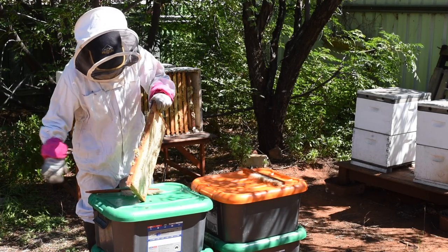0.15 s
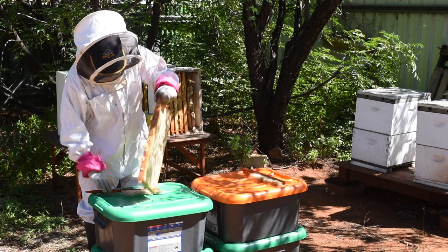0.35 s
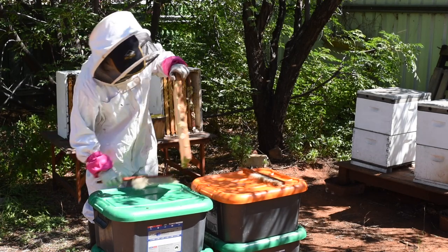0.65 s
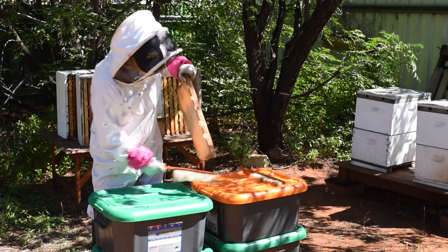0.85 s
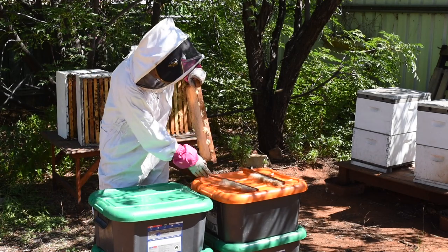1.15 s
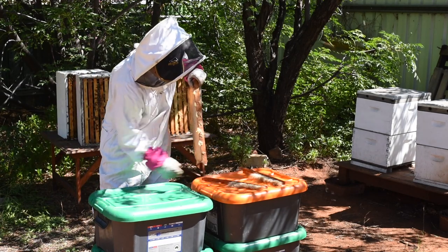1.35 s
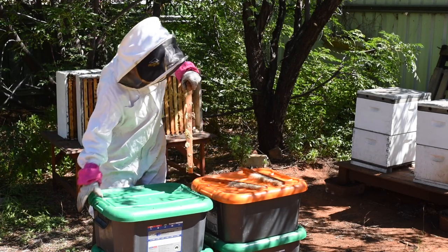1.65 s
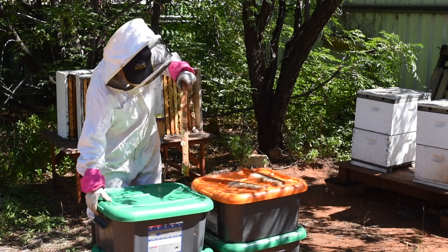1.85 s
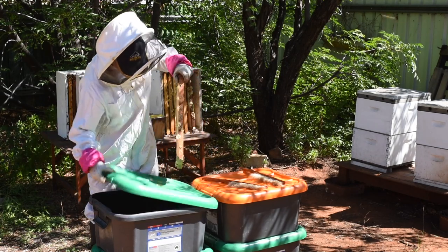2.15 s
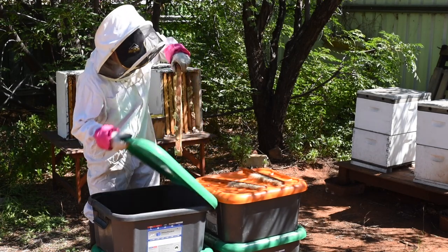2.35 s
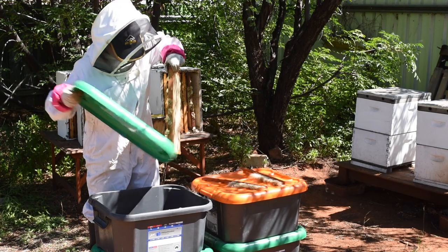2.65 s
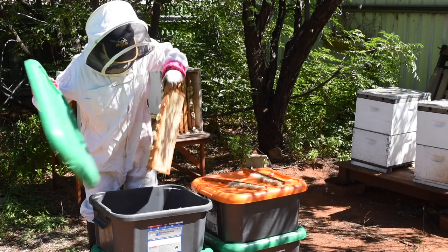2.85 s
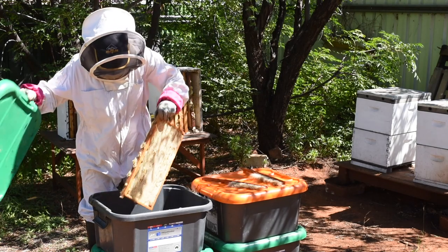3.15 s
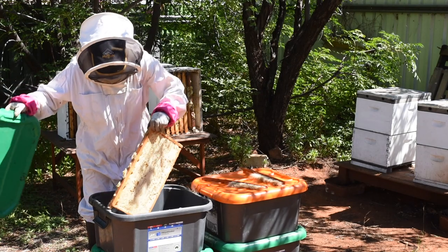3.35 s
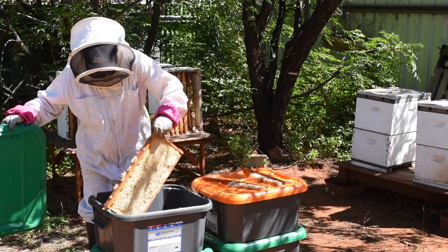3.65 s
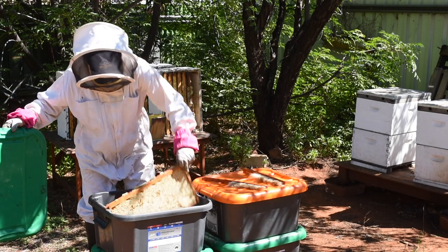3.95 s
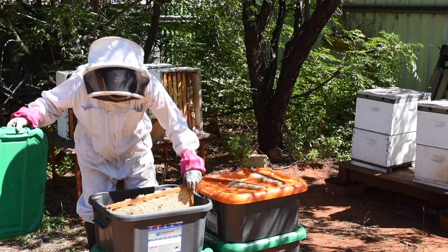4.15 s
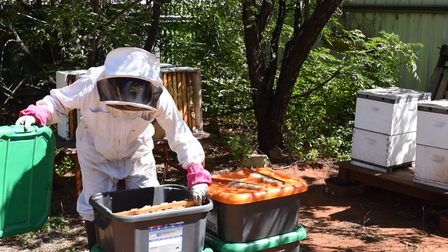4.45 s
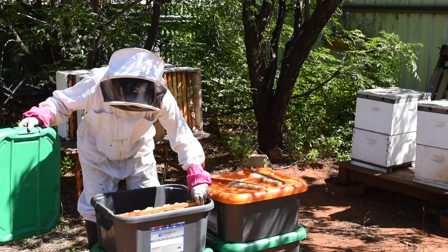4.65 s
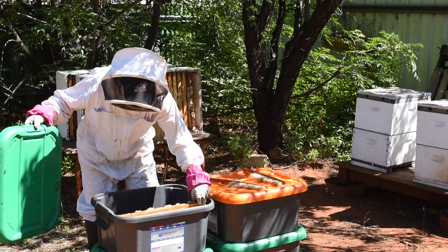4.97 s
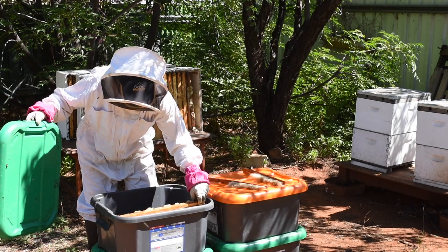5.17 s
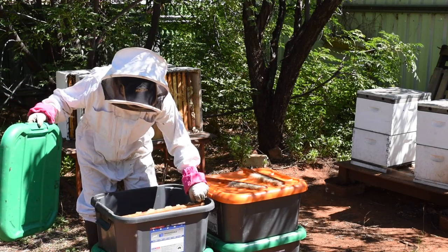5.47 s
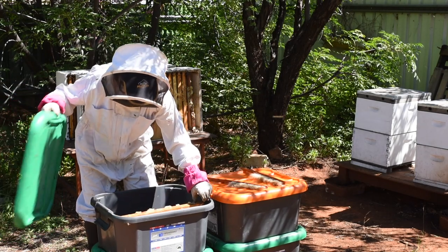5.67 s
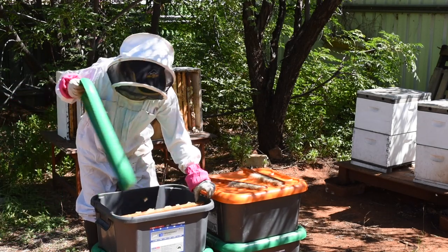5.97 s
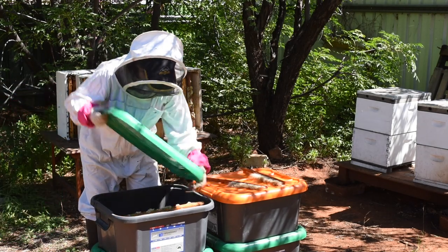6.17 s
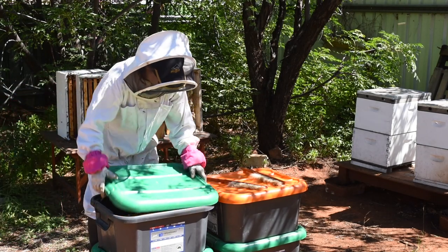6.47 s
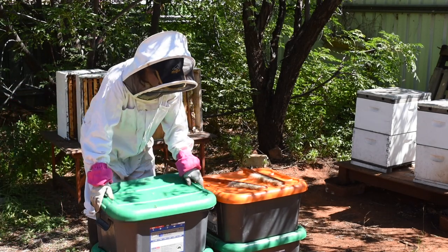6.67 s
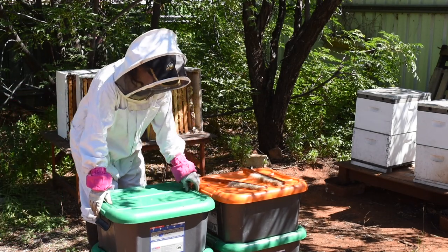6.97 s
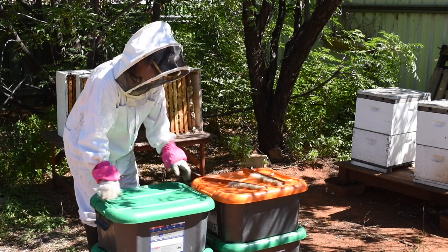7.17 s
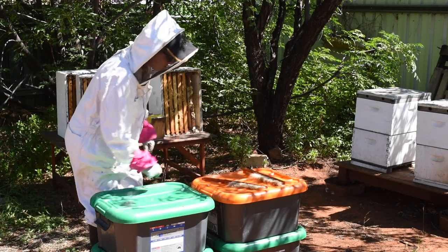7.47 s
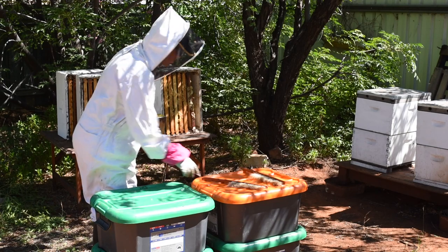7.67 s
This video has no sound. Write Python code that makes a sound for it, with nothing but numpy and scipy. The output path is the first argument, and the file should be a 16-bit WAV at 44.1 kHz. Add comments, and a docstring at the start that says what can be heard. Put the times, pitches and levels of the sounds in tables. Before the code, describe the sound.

Outdoors beside open hives, dozens of bees hum in a steady low drone over faint air and hiss. A metal tool drops sharply onto a plastic tub lid, the lid is pried up with light ticks and scrapes, then a wooden frame falls into the tub with a loud hollow clunk and smaller knocks. The lid is pressed shut with several snaps while the hum swells. Close, dry, nearly mono microphone.

```python
"""Honey bees hum steadily around open hives; a hive tool drops on a plastic tub, its lid is pried off,
a wooden frame is lowered in and falls flat, and the lid is snapped shut while the hum swells.
Blows are sums of decaying modes and filtered noise with a crack at contact; scrapes are random slips
that ring the plastic; each bee is a wing cycle read at a wandering rate; air and hiss are shaped noise."""
import sys
import numpy as np
from scipy import signal
from scipy.fft import rfft, irfft
from scipy.io import wavfile
from scipy.ndimage import uniform_filter1d, map_coordinates

SR = 44100
rng = np.random.default_rng(int(sys.argv[2]) if len(sys.argv) > 2 else 0)


def generate_wav(signal):
    """Clip the signal to [-1, 1] and save it as 16-bit WAV at the path in sys.argv[1]."""
    frames = np.transpose(np.atleast_2d(signal))
    scaled = np.clip(frames, -1, 1) * 32767
    pcm = np.round(scaled).astype(np.int16)
    wavfile.write(sys.argv[1], SR, pcm)


N = 344862
BLOW_S = 0.5


def undb(db):
    """Decibels to amplitude gain."""
    return 10 ** (np.asarray(db) / 20)


def unit(x):
    """Scale to rms 1."""
    return x / np.sqrt(np.mean(x ** 2) + 1e-20)


def add(track, start_s, sound):
    """Mix a sound into a track, cut at the track's end."""
    start = int(start_s * SR)
    track[start:start + len(sound)] += sound[:len(track) - start]


def band(x, lo_hz, hi_hz):
    """Causal third-order Butterworth band-pass."""
    return signal.sosfilt(signal.butter(3, [lo_hz, hi_hz], "band", fs=SR, output="sos"), x)


def coloured(points, size=N):
    """Noise of rms 1 whose spectrum follows (Hz, relative dB) points, joined on a log axis."""
    hz, db = np.transpose(points)
    f = np.arange(size // 2 + 1) * SR / size
    gain = undb(np.interp(np.log(f + 1), np.log(hz), db))
    return unit(irfft(rfft(rng.standard_normal(size)) * gain, size))


def walk(rate_hz):
    """Smooth random curve with a spread near 1: a cubic spline through rate_hz knots a second."""
    knots = rng.standard_normal(1024)
    coarse = np.arange(0, N + 128, 128)
    curve = map_coordinates(knots, [coarse / SR * rate_hz], order=3, mode="wrap")
    return np.interp(np.arange(N), coarse, curve)


def ring(modes, t, detune=0.006, weight_spread_db=0.53):
    """Decaying sine modes of a struck object; each blow lands elsewhere and reweights them."""
    hz, db, t60_s = np.transpose(modes)[:, :, None]
    shift, weight, angle = rng.standard_normal((3, len(modes), 1))
    waves = np.sin(2 * np.pi * (hz * (1 + detune * shift) * t + angle))
    decay = undb(db + weight_spread_db * weight - 60 * t / t60_s)
    return np.sum(decay * waves, axis=0) / np.sqrt(np.sum(undb(db) ** 2) / 2)


# Dense wall ring. Each row: frequency in Hz, time to decay by 60 dB in s.
WALL_DECAY = [(80, 0.47), (210, 0.28), (560, 0.32), (1470, 0.23), (3880, 0.33), (10200, 0.13)]


def walls(colour, t):
    """Dense rattle of the plastic walls: noise dying away octave by octave."""
    hz, t60_s = np.transpose(WALL_DECAY)
    noise = coloured(colour, size=len(t))
    rattle = np.zeros(len(t))
    for lo_hz in 62 * 2 ** np.arange(8):
        octave_t60_s = np.interp(np.log(lo_hz * np.sqrt(2)), np.log(hz), t60_s)
        rattle += band(noise, lo_hz, 2 * lo_hz) * undb(-60 * t / octave_t60_s)
    return rattle


SPOT_OCTAVES, SPOT_DECAY_S = 0.4, 0.0087


def spot(hz, t):
    """The struck spot: a brief noise burst in a narrow band around its pitch, peak 1."""
    half_width = 2 ** (SPOT_OCTAVES / 2)
    burst = rng.standard_normal(len(t)) * np.exp(-t / SPOT_DECAY_S)
    cluster = band(burst, hz / half_width, hz * half_width)
    return cluster / np.abs(cluster).max()


# Limits in Hz of the five registers: boom, thud, knock, clack, tick.
REGISTER_EDGES_HZ = [108, 280, 900, 2000, 5500, 12500]
HARDNESS_PIVOT_HZ = 1360
# Whole-tub shove; its level grows faster than the blow (dB per dB).
THUMP_HZ, THUMP_DECAY_S, THUMP_GROWTH = 48.3, 0.034, 1.55


def blows(hits, modes, colour, voice, modes_db, spot_db, thump_db):
    """Contact cracks, then spot, modes and walls ring; hardness tilts the registers above the boom."""
    t = np.arange(int(BLOW_S * SR)) / SR
    thump = np.sin(2 * np.pi * THUMP_HZ * t) * np.exp(-t / THUMP_DECAY_S)
    out = np.zeros(N)
    for start_s, strength_db, hardness_db_per_oct, boom_db, spot_hz in hits:
        body = undb(modes_db) * ring(modes, t) + walls(colour, t)
        for k, (level_db, crack_db, crack_s) in enumerate(voice):
            lo_hz, hi_hz = REGISTER_EDGES_HZ[k], REGISTER_EDGES_HZ[k + 1]
            share_db = boom_db
            if k > 0:
                share_db = hardness_db_per_oct * np.log2(np.sqrt(lo_hz * hi_hz) / HARDNESS_PIVOT_HZ)
            crack = undb(crack_db) * np.exp(-(t / crack_s) ** 2)
            part = band(body * (1 + crack), lo_hz, hi_hz)
            # level is set by the attack alone
            attack = t < .01 + 2 / lo_hz
            add(out, start_s, part / np.std(part[attack]) * undb(strength_db + level_db + share_db))
        add(out, start_s, spot(spot_hz, t) * undb(strength_db + spot_db))
        add(out, start_s, thump * undb(THUMP_GROWTH * strength_db + thump_db))
    return out


# Tool blows. Each row: start in seconds, strength in dB, hardness in dB per octave, boom in dB,
# pitch of the struck spot in Hz.
TOOL_BLOWS = [(.475, -45.5, -4.5, 8, 450), (1.165, -26.5, -0.4, 2.5, 670), (1.278, -14.5, 3, -1.5, 1300),
              (1.297, -31, 3, 2, 1530), (1.342, -30, -2.5, 3, 1500)]
# Modes of the shut tub. Each row: frequency in Hz, relative level in dB, time to decay by 60 dB in s.
SHUT_TUB_MODES = [(110, -2.5, 0.3), (160, 6.5, 0.21), (196, -5.5, 0.3), (414, 3, 0.14), (619, 0, 0.18),
                  (708, 7.5, 0.07), (795, 0.5, 0.18), (855, -2, 0.23), (1280, -6, 0.11),
                  (1292, 12.5, 0.037), (1370, -4, 0.35), (1484, 6, 0.21), (1613, -7, 0.31),
                  (1980, -30, 0.14), (3060, 4, 0.047), (4340, -22, 0.49), (4170, 0, 0.18),
                  (8430, -10, 0.042)]
# Wall rattle spectrum. Each row: frequency in Hz, relative level in dB.
TOOL_RATTLE = [(60, -36), (150, 4), (290, -10), (420, -8), (520, -7), (750, -11), (1050, -13.5),
               (1300, -2.5), (2200, -17), (2900, -10.5), (3700, -18), (4300, -16.5), (8500, -19),
               (11000, -36), (15000, -37)]
# One row per register: level in dB, crack over the ring in dB, crack length in seconds.
TOOL_REGISTERS = [(-7, -8, 0.03), (-4.5, -5, 0.0033), (-3, -7, 0.0033), (-9.5, 10.5, 0.0024),
                  (-15, 19, 0.0016)]


def hive_tool():
    """Metal tool dropped on the lid of the shut tub."""
    return blows(TOOL_BLOWS, SHUT_TUB_MODES, TOOL_RATTLE, TOOL_REGISTERS,
                 modes_db=2, spot_db=2, thump_db=-26)


# Lid blows. Each row: start in seconds, strength in dB, hardness in dB per octave, boom in dB,
# pitch of the struck spot in Hz.
LID_BLOWS = [(2.195, -41, -3, 10, 300), (2.222, -30.5, -1.5, 4, 500), (2.256, -42.5, 6, 12.5, 222),
             (2.367, -42, -0.5, 8.5, 246), (2.408, -44, 4, 5, 2500), (2.449, -30, 1, 2.5, 2900),
             (6.299, -39, 3, -17, 448), (6.367, -55, 9, -9, 2500), (6.565, -20.5, -0.3, -12.5, 1560),
             (6.594, -32, -.5, -3, 1200), (6.671, -19.5, -0.1, -10.5, 1360), (6.716, -30.5, 2.5, -5, 2840),
             (6.757, -38, -3.5, -13, 910), (6.806, -26, 2.5, -1.5, 2680), (6.870, -22, -0.3, -0.5, 880),
             (7.050, -37.5, 2.5, 7, 586)]
# Modes of the lid. Each row: frequency in Hz, relative level in dB, time to decay by 60 dB in s.
LID_MODES = [(122.8, -19.5, 0.83), (149.2, -7, 0.59), (185.2, 2.5, 0.19), (229.7, 6, 0.09),
             (357, -0.5, 0.24), (597, 6, 0.14), (727, 10, 0.025), (846, -2.5, 0.12), (953, -11.5, 0.17),
             (1155, 1.5, 0.12), (1403, 3, 0.031), (1500, -2.5, 0.08), (1900, -15, 0.13), (2315, 1, 0.043),
             (2960, -8, 0.11), (3130, -6, .08), (4300, -44, .11)]
# Wall rattle spectrum. Each row: frequency in Hz, relative level in dB.
LID_RATTLE = [(60, -24), (190, -8), (270, -14), (370, -1), (500, -14.5), (620, -7.5), (1000, -9),
              (1450, -11.5), (2100, -16), (2900, -17.5), (3700, -25.5), (5500, -29.5), (9000, -37),
              (15000, -85)]
# One row per register: level in dB, crack over the ring in dB, crack length in seconds.
LID_REGISTERS = [(0, -11, 0.026), (-2, 2.5, 0.0059), (-1, 6, 0.0077), (-9, 10.5, 0.0034), (-27, -1, .0074)]


def tub_lid():
    """Plastic lid pried off, later laid back and snapped shut."""
    return blows(LID_BLOWS, LID_MODES, LID_RATTLE, LID_REGISTERS,
                 modes_db=2.5, spot_db=5.5, thump_db=-20)


# Frame blows. Each row: start in seconds, strength in dB, hardness in dB per octave, boom in dB,
# pitch of the struck spot in Hz.
FRAME_BLOWS = [(3.470, -47, -6.5, 8.5, 390), (3.596, -40, -5, 8, 660), (3.921, -42, -3.5, 13, 230),
               (3.936, -40.5, -3.5, 3.5, 700), (4.538, -13.5, -1, -3.5, 1020), (4.542, -17, 2.5, 1, 600),
               (4.562, -19.5, -0.5, 0, 370), (4.614, -20, -0.5, -1, 510), (4.699, -39, 0.5, -12, 1510),
               (4.808, -37.5, 2.5, -19, 2340), (5.267, -28, 1, -4, 870), (5.339, -38, 2, -1, 680),
               (5.454, -24.5, -0.8, -6, 624)]
# Modes of the open tub. Each row: frequency in Hz, relative level in dB, time to decay by 60 dB in s.
OPEN_TUB_MODES = [(107.8, -1.5, 0.48), (156, -3, 0.16), (194.8, 2.5, 0.2), (236.6, -5.5, 0.25),
                  (385, -12.5, 0.21), (397, 10.5, 0.041), (446, 2.5, 0.036), (609, 2, 0.11),
                  (734, -0.5, 0.076), (845, -27, 0.16), (1130, -4, 0.038), (1266, -8, 0.07),
                  (2070, -36, 0.13), (2310, -34, 0.1)]
# Wall rattle spectrum. Each row: frequency in Hz, relative level in dB.
FRAME_RATTLE = [(60, 1), (105, 3), (190, 6), (290, -3.5), (380, -3.5), (520, -4.5), (640, -7.5),
                (1150, -16), (1700, -21), (2500, -20), (3600, -27.5), (5000, -24), (6500, -37.5),
                (8600, -29), (15000, -82)]
# One row per register: level in dB, crack over the ring in dB, crack length in seconds.
FRAME_REGISTERS = [(-1.5, 8.8, 0.0062), (-3, 3.2, 0.019), (-3.5, 5.2, 0.0074), (-11.5, 11, .0078),
                   (-20, 4.7, 0.0072)]


def wooden_frame():
    """Wooden frame knocking into the open tub and falling flat."""
    return blows(FRAME_BLOWS, OPEN_TUB_MODES, FRAME_RATTLE, FRAME_REGISTERS,
                 modes_db=-1.5, spot_db=2.5, thump_db=-21)


# Plastic and wood rubbing on the tub. Each row: middle in seconds, half length in seconds,
# level of the loudest stretch in dB, brightness in Hz.
RUBS = [(2.01, 0.1, -43.5, 1200), (2.19, .025, -36, 150), (2.24, 0.029, -28.5, 800),
        (2.434, 0.028, -34, 2500), (2.47, 0.024, -27.5, 6960), (2.529, .11, -43, 100),
        (3.609, .012, -38.5, 1200), (4.598, 0.052, -26.5, 5000), (6.776, 0.03, -33.5, 2000),
        (6.895, 0.021, -33, 2500), (7.056, .022, -30.5, 400)]


def scrapes(slips_per_s=1600, scatter_db=3.0, modes_db=-2, crack_db=14, crack_s=0.0025):
    """A rim sticks and slips along the tub; every slip rings the plastic."""
    t = np.arange(int(BLOW_S * SR)) / SR
    out = np.zeros(N)
    for middle_s, half_s, level_db, bright_hz in RUBS:
        slips = rng.random(len(t)) < slips_per_s / SR
        slips = slips * undb(scatter_db * rng.standard_normal(len(t)))
        slips = slips * np.exp(-((t - t.mean()) / half_s) ** 2)
        body = undb(modes_db) * ring(LID_MODES, t) + walls(FRAME_RATTLE, t)
        body = body * (1 + undb(crack_db) * np.exp(-t / crack_s))
        # a harder edge slips more abruptly: less bass, more treble
        edge_hz = [110 + 0.031 * bright_hz, 160 + bright_hz]
        edge = signal.butter(1, edge_hz, "band", fs=SR, output="sos")
        rub = signal.sosfilt(edge, signal.fftconvolve(slips, body))
        loudest = np.sqrt(uniform_filter1d(rub ** 2, size=1500).max())
        add(out, middle_s - t.mean(), rub / loudest * undb(level_db))
    return out


# Partials of a wingbeat. Each row: multiple of the wingbeat rate, relative level in dB.
WING_PARTIALS = [(1, 0.5), (2, 7), (3, -0.5), (4, 2), (5, -0.5), (6, -2), (8, -9), (11, -16.5), (16, -22.5),
                 (22, -19.5)]


def bee(wingbeat_hz, drift=.042, flutter=.018, near_db=3.5, turn_db=3.0):
    """One bee: a buzzing wing cycle whose rate and strength wander as it darts about."""
    multiple, db = np.transpose(WING_PARTIALS)
    k = np.arange(1, 25)
    partials_db = np.interp(k, multiple, db) + 2.6 * rng.standard_normal(len(k))
    partials = undb(partials_db) * np.exp(2j * np.pi * rng.random(len(k)))
    cycle = unit(irfft(np.r_[0, partials], 2 ** 14))
    rate_hz = wingbeat_hz * (1 + drift * walk(2.5) + flutter * walk(22))
    phase = np.cumsum(rate_hz) / SR
    buzz = cycle[(phase % 1 * len(cycle)).astype(int)]
    return buzz * undb(near_db * walk(1.426) + turn_db * walk(7.7))


# Single bees darting past. Each row: nearest moment in seconds, half length in seconds,
# wingbeat in Hz, level in dB.
DARTING_BEES = [(0.91, 0.03, 240, -46.5), (5.753, 0.05, 223, -56), (7.46, 0.033, 223.2, -49.5)]
WINGBEAT_HZ = 229
# Even hum until the swarm is stirred up, then it draws nearer.
SWARM_DB, STIRRED_S, SWELL_DB_PER_S = -50, 4.94, 1.5


def swarm(count=34, spread=.07):
    """Many bees, most near the common wingbeat, a few well off it; single bees dart past."""
    t = np.arange(N) / SR
    rank = (np.arange(count) + .5) / count
    # logistic spread of wingbeats
    offsets = spread * .5 * np.log(rank / (1 - rank))
    hum = unit(sum(bee(WINGBEAT_HZ * (1 + offset)) for offset in offsets))
    hum = hum * undb(SWARM_DB + SWELL_DB_PER_S * np.maximum(t - STIRRED_S, 0))
    for nearest_s, half_s, wingbeat_hz, level_db in DARTING_BEES:
        passing = undb(level_db) / (1 + ((t - nearest_s) / half_s) ** 2)
        hum = hum + unit(bee(wingbeat_hz, drift=0.0046, near_db=5)) * passing
    return hum


# Still air and microphone hiss. Each row: frequency in Hz, relative level in dB.
AIR_SPECTRUM = [(25, -21), (60, -5), (90, -7.5), (140, -0.5), (300, 0.5), (600, 0.5), (1100, -4.5),
                (2000, -8), (3300, -13), (5200, -15), (6400, -18), (8600, -14), (10300, -20.5),
                (16000, -20.5)]


def still_air(level_db=-48.5):
    """Steady shaped noise of the air and the microphone."""
    return coloured(AIR_SPECTRUM) * undb(level_db)


# Spectrum of the faint noise that differs left from right. Each row: frequency in Hz, relative level in dB.
SIDE_NOISE_SPECTRUM = [(25, -10), (60, 4), (150, 3.5), (350, 5.5), (1000, -13), (2500, -17), (5000, -0.5),
                       (8500, 0), (12000, 4.5), (16000, -7)]


def stereo(x, copy_db=-23, side_noise_db=-65.0):
    """Near-mono stereo: a faint side signal of shaped noise and a delayed, treble-lifted copy."""
    # second difference lifts the treble; delayed 17 samples
    treble_copy = np.roll(np.diff(x, 2, prepend=[0, 0]), 17)
    side = undb(copy_db) * treble_copy + undb(side_noise_db) * coloured(SIDE_NOISE_SPECTRUM)
    return x + np.array([[1], [-1]]) * side


def scene():
    """Tool, lid and frame knock and scrape on the tub over the swarm and still air, in stereo."""
    return stereo(hive_tool() + tub_lid() + wooden_frame() + scrapes() + swarm() + still_air())


def record(dry, top_hz=15950):
    """The recorder flattens peaks at full scale and cuts the treble above top_hz."""
    lowpass = signal.ellip(10, .1, 80, top_hz, fs=SR, output="sos")
    return signal.sosfilt(lowpass, np.clip(dry, -1, 1))


dry = scene()
out = record(dry)
generate_wav(out)
```